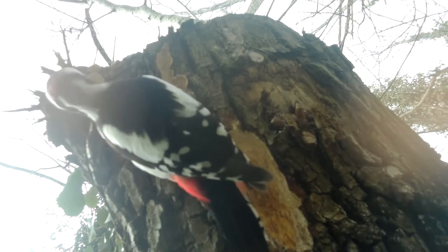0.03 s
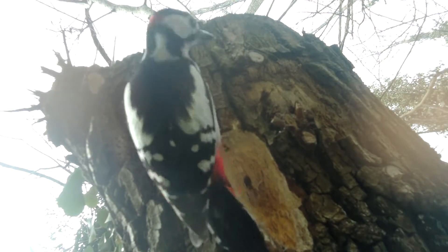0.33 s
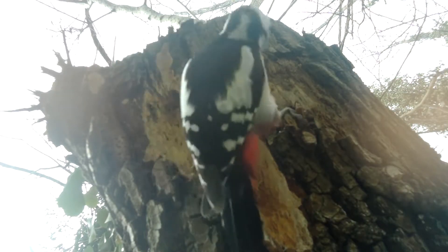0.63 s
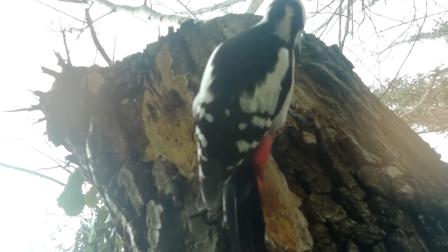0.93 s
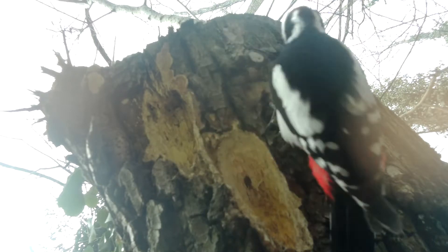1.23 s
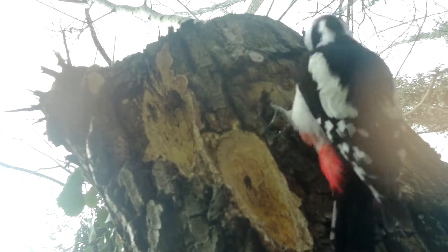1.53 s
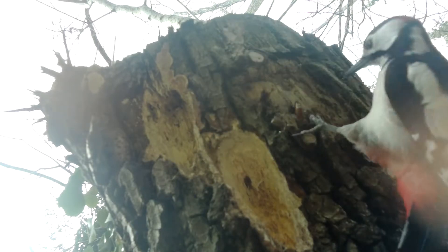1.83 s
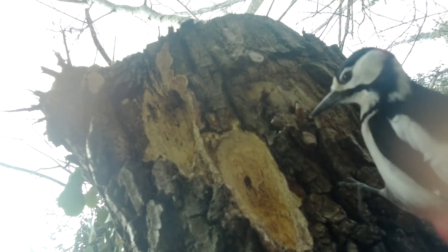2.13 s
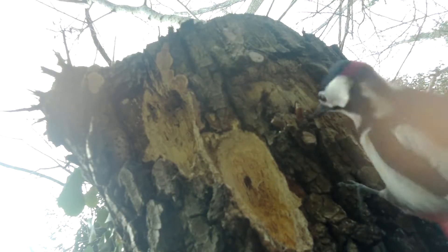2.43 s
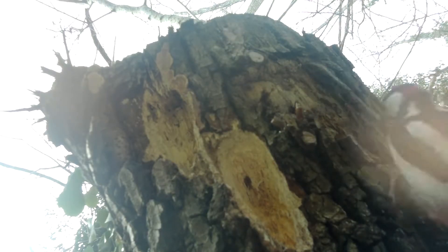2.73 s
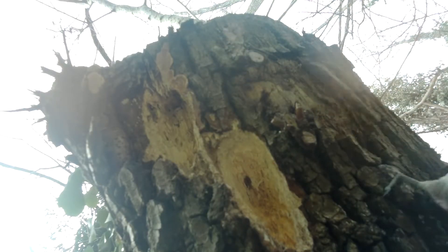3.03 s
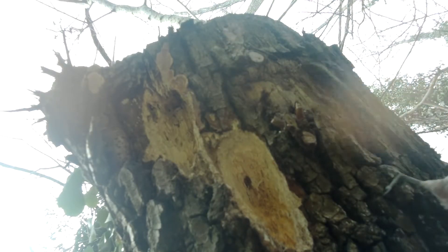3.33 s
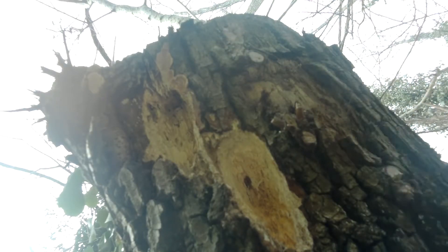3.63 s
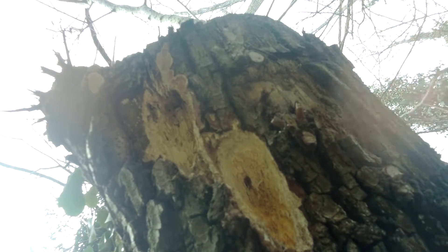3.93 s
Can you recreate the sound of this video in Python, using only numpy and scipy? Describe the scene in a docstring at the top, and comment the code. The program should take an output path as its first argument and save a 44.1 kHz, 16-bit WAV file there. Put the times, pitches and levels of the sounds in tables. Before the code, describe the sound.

A woodpecker's claws scrape and snap on bark, with two sharp knocks and faint birds.

```python
"""Woodpecker on a dead trunk

A woodpecker clambers over a dead trunk, very close. Its claws snap and scrape on the bark,
its feathers rustle, and its knocks ring the wood. Small birds call among the trees,
and wind buffets the microphone over a soft bed of forest air."""
import sys
import numpy as np
from scipy import signal
from scipy.fft import rfft, irfft
from scipy.io import wavfile
from scipy.ndimage import uniform_filter1d

SR = 44100
rng = np.random.default_rng(int(sys.argv[2]) if len(sys.argv) > 2 else 0)


def transcribe(signal):
    """Save signal, clipped to [-1, 1], as a 16-bit WAV file at the path in sys.argv[1]."""
    frames = np.atleast_2d(signal).T
    limited = np.clip(frames, -1, 1)
    pcm = np.round(limited * 32767).astype(np.int16)
    wavfile.write(sys.argv[1], SR, pcm)


N = 176400
CUTOFF_HZ = 16100


def amp(db):
    return 10 ** (np.asarray(db) / 20)


def unit_rms(x):
    return x / np.sqrt(np.mean(x ** 2) + 1e-20)


def match_energy(burst, length_s):
    """Gives a burst the energy of a unit-RMS sound of that length."""
    return burst * np.sqrt(length_s * SR / (np.sum(burst ** 2) + 1e-20))


def eq_db(curve, hz):
    """Gain of an EQ curve, interpolated over log frequency."""
    points_hz, gain_db = np.transpose(curve)
    return np.interp(np.log(hz + 1), np.log(points_hz + 1), gain_db)


def add(mix, start_s, sound):
    part = mix[max(round(start_s * SR), 0):][:len(sound)]
    part += sound[:len(part)]


def noise(curve):
    """Steady noise coloured by an EQ curve."""
    gain = amp(eq_db(curve, np.fft.rfftfreq(N, 1 / SR)))
    return unit_rms(irfft(rfft(rng.standard_normal(N)) * gain, N))


def wobble(count, smooth_s):
    """A smoothed random control signal."""
    return unit_rms(uniform_filter1d(rng.standard_normal(SR), size=int(smooth_s * SR)))[:count]


def clicks(count, per_s, spread_db):
    """Random clicks of uneven size."""
    size = amp(spread_db * np.minimum(rng.exponential(1, count), 4))
    return rng.choice([-1., 1.], count) * size * (rng.random(count) < per_s / SR)


def echo(x, t60_s):
    """Sparse reflections that build quickly and die away."""
    t = np.arange(SR) / SR
    tail = clicks(SR, per_s=2000, spread_db=1) * amp(-60 * t / t60_s) * (1 - np.exp(-20 * t / t60_s))
    return signal.fftconvolve(x, tail / np.linalg.norm(tail))[:N]


def turbulence(curve, window):
    """Noise with its own slow swells evened out, ready to follow the gusts."""
    x = noise(curve)
    power = uniform_filter1d(uniform_filter1d(x ** 2, size=window), size=window)
    return x / np.sqrt(power + 1e-6)


# Rise and fall of the wind: (time [s], level [dB])
GUSTS = [(0, -29.5), (.12, -28), (.25, -36), (1.0, -35.5), (1.35, -33), (1.5, -23.5), (1.82, -29.5),
         (2.1, -23.5), (2.45, -26.5), (4, -25.5)]
# Deep rumble of the wind: (frequency [Hz], gain [dB])
RUMBLE_EQ = [(1, 4.5), (4, -3.5), (9, 11), (19, 4.5), (28, -9), (55, -10), (85, -24), (130, -51.5),
             (300, -77.5)]
# Lighter flutter above it: (frequency [Hz], gain [dB])
FLUTTER_EQ = [(30, -35), (70, -1.5), (105, 0), (150, -11), (220, -20), (330, -39.5), (700, -80)]
# Eddies thumping the microphone: (time [s], flutter width [s], push [dB], flutter [dB])
EDDY_THUMPS = [(0.808, 0.022, -16, -55), (1.502, 0.025, -19.5, -51), (1.72, 0.02, -11, -31.5),
               (1.943, 0.02, -9, -46), (2.117, 0.015, -7, -63), (2.236, 0.038, -12, -24.5),
               (2.711, 0.022, -5, -36), (2.928, 0.092, -10.5, -39.5), (3.339, 0.033, -10.5, -31.5),
               (3.587, 0.017, -31, -31), (3.748, 0.014, -11.5, -28.5), (3.922, 0.029, -7, -29.5)]


def wind(push_s=0.0082):
    """Rumble and flutter ride the gusts; each eddy adds a push of pressure and a burst of flutter."""
    t = np.arange(N) / SR
    gust_db = np.interp(t, *np.transpose(GUSTS))
    rumble = turbulence(RUMBLE_EQ, window=6000) * amp(gust_db + 10)
    flutter_gain = amp(0.87 * gust_db - 23)
    for time, width, push_db, flutter_db in EDDY_THUMPS:
        u = (t - time) / push_s
        rumble -= amp(push_db) * (1 - u ** 2) * np.exp(-u ** 2 / 2)
        flutter_gain += amp(flutter_db) * np.exp(-((t - time) / width) ** 2)
    return rumble + flutter_gain * turbulence(FLUTTER_EQ, window=2000)


# Tone of the forest bed: (frequency [Hz], gain [dB])
AIR_EQ = [(60, 7.5), (300, 6.5), (750, 0), (1150, 1.5), (1700, -4.5), (2600, -5.5), (4400, -6.5),
          (6000, -8.5), (10000, -12.5), (14400, -12), (16000, -24)]


def forest_air(level_db=-52.5):
    """The soft, steady hush of air in the forest."""
    return amp(level_db) * noise(AIR_EQ)


def bird_tone(hz, waver_hz):
    """A unit-level whistle that wavers around its pitch line."""
    pitch = hz + waver_hz * wobble(len(hz), smooth_s=0.0039)
    return np.sqrt(2) * np.sin(2 * np.pi * np.cumsum(pitch) / SR)


# Background birds: (start [s], length [s], first pitch [Hz], last pitch [Hz], level [dB])
FAR_CALLS = [(0.01, 0.045, 3780, 4000, -54), (.066, 0.043, 4300, 4090, -51), (.18, 0.084, 2455, 2390, -57),
             (.345, 0.16, 8340, 8640, -65), (.69, 0.11, 3490, 3484, -61.5),
             (0.975, 0.15, 2950, 2620, -58.5), (1.008, 0.1, 3280, 3210, -57.5),
             (1.76, 0.136, 2426, 2622, -61), (2.385, 0.043, 4270, 3850, -63),
             (3.015, 0.046, 3610, 3544, -63), (3.272, 0.02, 9640, 6800, -47.5)]


def far_birds():
    """Distant, gently arched calls, blurred by the trees."""
    calls = np.zeros(N)
    for start, length, first_hz, last_hz, level_db in FAR_CALLS:
        progress = np.arange(0, length, 1 / SR) / length
        arch = abs(np.sin(np.pi * progress))
        glide = (first_hz + (last_hz - first_hz) * progress) * (1 + 0.02 * arch)
        add(calls, start, amp(level_db) * bird_tone(glide, 0.099 * np.ptp(glide)) * np.sqrt(arch))
    return amp(1.5) * calls + echo(calls, t60_s=0.35)


# A falling whistle and an arched call, each as breakpoints: (time [s], pitch [Hz], level [dB])
CLEAR_CALLS = [
    [(0.056, 5480, -68), (.08, 5300, -42), (0.106, 5200, -60), (.122, 4640, -36.5), (0.144, 4336, -36.5),
     (0.167, 4310, -34.5), (.18, 4470, -61)],
    [(3.782, 2900, -46), (3.792, 4100, -47), (3.805, 3550, -43), (3.813, 4750, -41), (3.828, 4250, -53),
     (3.857, 4300, -42), (3.872, 3500, -39.5), (3.889, 3330, -40)],
]


def clear_birds():
    """Two clear whistles, scattered by nearby twigs and trailing off into the forest."""
    calls = np.zeros(N)
    for call in CLEAR_CALLS:
        times, hz, level_db = np.transpose(call)
        t = np.arange(times[0], times[-1], 1 / SR)
        whistle = bird_tone(np.interp(t, times, hz), waver_hz=25.4)
        add(calls, times[0], whistle * amp(np.interp(t, times, level_db)))
    scattered = amp(-2) * calls + amp(-7) * echo(calls, t60_s=0.079)
    return scattered + amp(-12.5) * echo(scattered, t60_s=0.8)


# Feathers brushing as the bird shifts: (start [s], length [s], level [dB])
FEATHER_MOVES = [(0.062, 0.28, -55), (0.443, 0.2, -51), (0.763, 0.12, -53.5), (1.075, 0.25, -46.5),
                 (1.348, 0.23, -57.5), (1.561, 0.23, -48), (1.901, 0.11, -50), (1.998, 0.14, -52.5),
                 (2.605, 0.086, -54), (2.732, 0.21, -53), (3.119, 0.059, -52), (3.442, 0.2, -51),
                 (3.782, .18, -54.5)]
# Tone of the rustle: (frequency [Hz], gain [dB])
FEATHER_EQ = [(200, -27), (600, 5.5), (1400, 0.5), (2500, 7), (5000, 3.5), (8300, 3.5), (12000, -4.5),
              (16000, -11)]


def feathers(bands=5, fade_s=0.022):
    """Fine crackle that swells with each movement; each barb ticks in its own range of pitch."""
    t, hz = np.arange(N) / SR, np.fft.rfftfreq(N, 1 / SR)
    motion = sum(amp(db) * np.clip(np.minimum(t - start, start + length - t) / fade_s + .5, 0, 1)
                 for start, length, db in FEATHER_MOVES)
    band_position = np.sqrt(hz / CUTOFF_HZ) * (bands - 1)
    barbs = 0
    for band in range(bands):
        band_gain = np.cos(np.pi / 2 * np.clip(band_position - band, -1, 1))
        barbs += rfft(clicks(N, per_s=2500, spread_db=7)) * band_gain
    return motion * unit_rms(irfft(barbs * amp(eq_db(FEATHER_EQ, hz)), N))


def bark_crumbs(count=36, start_s=0.11, span_s=1.6, centre_hz=8330):
    """Crumbs of bark tick at random moments while the bird climbs."""
    ticks = np.zeros(N)
    for when, size, pitch in rng.random((count, 3)):
        level_db = -53 - 3.5 * np.log(size)
        ring_hz = centre_hz * 2 ** (pitch - .5)
        add(ticks, start_s + when * span_s, snap(level_db, ring_hz, body_db=-6, edge_db=4.4))
    return ticks


# Overall tone of the bark: (frequency [Hz], gain [dB])
BARK_EQ = [(150, -9.5), (330, 0), (520, -7), (1000, -2.5), (2100, 3), (2800, 4.5), (4000, 4.5), (7200, 0),
           (9000, -3), (11500, -6), (13500, -15), (16000, -21)]


def bark(x, body_db, edge_db):
    """Colours x with one patch of bark and its small resonances; body sets the mids, edge the top."""
    hz = np.fft.rfftfreq(512, 1 / SR)
    resonance_db = 3.5 * unit_rms(uniform_filter1d(rng.standard_normal(len(hz)), size=7))
    tilt_db = eq_db([(1780, body_db + 2.5), (4430, 0), (7500, edge_db + 2)], hz)
    log_gain = np.log(amp(eq_db(BARK_EQ, hz) + tilt_db + resonance_db))
    # Minimum phase keeps the attacks sharp.
    response = np.exp(np.conj(signal.hilbert(np.r_[log_gain, log_gain[-2:0:-1]])))
    return np.convolve(x, np.fft.ifft(response).real)


def snap(level_db, ring_hz, body_db, edge_db, ring_cycles=30, energy_s=0.0019):
    """A sharp crack and the brief ring of the flake that gave way; small, high flakes die soonest."""
    t = np.arange(700) / SR
    burst = rng.standard_normal(len(t)) * np.exp(-t / 0.00067)
    crack = match_energy(bark(burst, body_db, edge_db)[:len(t)], energy_s)
    ring = np.cos(2 * np.pi * ring_hz * t) * amp(-60 * t * ring_hz / ring_cycles)
    return amp(level_db) * (amp(-1.5) * crack + amp(-2) * match_energy(ring, energy_s))


# Claws and stiff tail dragging on bark: (start [s], length [s], level [dB], body [dB], edge [dB])
DRAGS = [(0.457, 0.0046, -38.5, -7, -3), (0.476, 0.033, -42.5, -7, -6), (0.518, 0.036, -40, 12, 12),
         (0.544, 0.018, -38, 13, 8), (0.585, 0.0029, -32, 1, 5), (0.598, 0.015, -37, 1.5, 9.5),
         (1.11, 0.012, -35.5, 1.5, 7), (1.138, 0.01, -29.5, -30, -4), (1.162, 0.005, -34.5, 20, 5),
         (1.18, 0.0097, -34.5, 10, 11), (1.214, 0.0057, -33, -4, -8), (1.235, 0.01, -26.5, -1, 11.5),
         (1.248, 0.015, -34.5, -16, 17), (1.27, 0.046, -45, -6, 19), (1.312, 0.02, -43, -3, 19),
         (1.572, 0.028, -34, 0, 8), (1.623, 0.018, -27.5, -0.5, 5), (1.642, 0.01, -29, -1, 6),
         (1.658, 0.026, -33, -7, 8), (1.688, 0.0065, -28.5, -8, -6), (1.713, 0.0068, -30.5, -8, 2),
         (1.726, 0.023, -34, 1, -2), (1.971, 0.028, -35, -11, 1), (1.997, 0.0058, -27, -19, -20),
         (2.027, 0.015, -34, -7, 0), (2.0463, 0.0048, -21.5, -5.5, -12), (2.061, 0.0061, -26, 1, -17),
         (2.076, 0.0095, -29.5, -5.5, -3.5), (2.688, 0.012, -37, -7, 2.5), (2.732, 0.0061, -31, -4.5, -10),
         (2.781, 0.01, -33.5, 7.5, -12), (2.797, 0.007, -32.5, 4, -13), (2.8155, 0.0052, -32.5, -7.5, -3),
         (2.824, 0.0068, -37, 1, 2), (2.922, 0.0095, -43.5, 10, -1), (3.448, 0.011, -37.5, -10, -3.5),
         (3.469, 0.009, -39, -2, 6), (3.506, 0.0056, -32.5, 1, -19), (3.5156, 0.0041, -26.5, 2, -6),
         (3.533, 0.0066, -37, -2, -6), (3.543, 0.01, -30.5, -1.5, -9), (3.557, 0.018, -35, -6, -16),
         (3.586, 0.008, -45, 18, -2), (3.84, 0.0074, -36, -15, -7), (3.864, 0.0044, -36, -15, -14),
         (3.89, 0.018, -30, -2.5, -6), (3.908, 0.013, -34.5, -5, -12), (3.922, 0.0079, -31.5, -7, -2),
         (3.947, 0.0073, -31.5, 0, -8)]


def scrapes(release_s=0.00072, swell_db=2.5, grip_db=3):
    """Quick runs of tiny slips that swell and fade, clumping as the claw grips and lets go."""
    track = np.zeros(N)
    for start, length, level_db, body_db, edge_db in DRAGS:
        t = np.arange(0, length + 6 * release_s, 1 / SR)
        grip = wobble(len(t), smooth_s=0.0017)
        swell = np.sin(np.pi * np.minimum(t / length, 1))
        release = np.exp(-np.maximum(t - length, 0) / release_s)
        pressure = amp(swell_db * swell + grip_db * grip) * release
        slips = clicks(SR, per_s=3500, spread_db=2.5)[:len(t)]
        scrape = bark(slips * pressure, body_db, edge_db)
        add(track, start, amp(level_db - 1) * match_energy(scrape, length))
    return track


# Claws catching on bark: (time [s], level [dB], ring [Hz], body [dB], edge [dB])
CLAW_CATCHES = [(0.502, -33.5, 4680, -3, 20), (0.5408, -33, 1120, 9, -4), (0.5474, -32.5, 1730, 8, 0),
                (0.562, -34.5, 3790, -6, 2), (0.5841, -35, 9200, -10, 1), (0.602, -33.5, 7900, -10, 13),
                (1.16, -26, 5970, -41, -16), (1.1735, -32.5, 3700, -17, 5), (1.196, -26, 3470, -23, -6),
                (1.1982, -27.5, 2950, -1, -1), (1.202, -26, 8700, -1, 5), (1.207, -34, 8300, -14, 9),
                (1.279, -34.5, 8560, -12, 6), (1.6287, -23, 2330, 5, -10), (1.6466, -24, 5300, -10, 26),
                (1.651, -20, 5000, -6, 1), (1.6546, -26, 2200, -5, -10), (1.6915, -23, 5950, -18, 10),
                (1.7097, -27.5, 6060, -4, 2), (1.7254, -26.5, 6100, -19, 7), (1.7297, -22.5, 5900, -30, -2),
                (1.74, -27, 3680, -16, 14), (1.7558, -37, 5200, -10, 0), (1.7912, -36, 8130, -13, -3),
                (1.9687, -18, 9700, 2, 26.5), (1.9819, -29, 8000, -12, 6), (1.9882, -26, 11100, -6, 10),
                (1.998, -23, 3320, -14, -8), (2.0215, -28, 3260, -12, -18), (2.0248, -25, 2260, -26, -12),
                (2.047, -20.5, 2130, -12, -8), (2.0563, -21, 3330, -16, -10), (2.059, -15.5, 3640, -16, -8),
                (2.0615, -9, 2084, -14, -23), (2.3755, -41, 10500, 4, 8), (2.7485, -25.5, 3660, -45, -10),
                (2.7774, -28, 4260, -3, -20), (3.51, -27.5, 3840, -7, -19), (3.519, -29, 2520, -6, 0),
                (3.522, -31, 4570, -6, -11), (3.5449, -29.5, 5100, -15, -10),
                (3.5491, -19.5, 4270, -11, -10), (3.5884, -26, 3940, 9, 11), (3.8874, -27.5, 2130, -12, -7),
                (3.8922, -24, 2040, -31, -2), (3.8972, -19, 4040, -22, -11), (3.9221, -24.5, 4600, -2, 1)]


def claw_snaps():
    """Flakes of bark break where the claws catch, one snap each."""
    track = np.zeros(N)
    for time, *flake in CLAW_CATCHES:
        add(track, time, snap(*flake))
    return track


# Ring of the trunk: (frequency [Hz], t60 [s], level at hollow spot [dB], level at hard spot [dB])
TRUNK_MODES = [(364, 0.041, -15, -17), (544, 0.015, -14.5, -21), (622, 0.068, -21.5, -41),
               (729, 0.052, -22.5, -28.5), (910, 0.019, -16, -17.5), (1147, 0.015, -18.5, -10),
               (1480, 0.016, -20.5, -20), (1824, 0.013, -13, -31), (2246, 0.011, -29, -11.5),
               (2764, 0.011, -21.5, -2), (3670, 0.0087, -25, -9), (4570, 0.0067, -54, -11),
               (6000, 0.0081, -31.5, -14)]
# Blows on the trunk: (time [s], level [dB], attack [s], crack [dB], spot [0 hollow to 1 hard])
BLOWS = [(0.828, 5.5, 0.000041, -29, 0.071), (3.1464, -0.5, 0.00088, -15.5, 0.94),
         (3.586, -16.5, 0.0013, -19, 0.11)]


def knocks(crack_decay_s=0.00073, low_cut_hz=240):
    """Each blow cracks on the bark and rings the trunk; the spot struck sets the mix of modes."""
    track = np.zeros(N)
    t = np.arange(6000) / SR
    low_cut = signal.butter(4, low_cut_hz, "high", fs=SR, output="sos")
    for time, level_db, attack_s, crack_db, spot in BLOWS:
        ring = 0
        for k, (hz, t60, hollow_db, hard_db) in enumerate(TRUNK_MODES):
            mode_db = hollow_db + (hard_db - hollow_db) * spot
            ring += (-1) ** k * amp(mode_db - 60 * t / t60) * np.sin(2 * np.pi * hz * t)
        burst = rng.standard_normal(len(t)) * np.exp(-t / crack_decay_s)
        crack = match_energy(bark(burst, body_db=-7, edge_db=-3.5)[:len(t)], length_s=0.0019)
        blow = amp(level_db) * (1 - np.exp(-t / attack_s)) * (ring + amp(crack_db) * crack)
        add(track, time, signal.sosfilt(low_cut, blow))
    return track


def scene():
    """The woodpecker up front and nearly dry, the forest behind, wind over all."""
    forest = wind() + forest_air() + far_birds() + clear_birds()
    woodpecker = feathers() + bark_crumbs() + scrapes() + claw_snaps() + knocks()
    return (forest + woodpecker + amp(-25.5) * echo(woodpecker, t60_s=0.11))[None]


def record(dry, ceiling=0.72):
    """A soft clip rounds off the loudest peaks, then a steep low-pass trims the very top."""
    rounded = dry / (1 + (dry / ceiling) ** 8) ** (1 / 8)
    low_pass = signal.firwin(401, CUTOFF_HZ, window=("kaiser", 8), fs=SR)
    return signal.oaconvolve(rounded, low_pass[None], "same")


dry = scene()
out = record(dry)
transcribe(out)
```